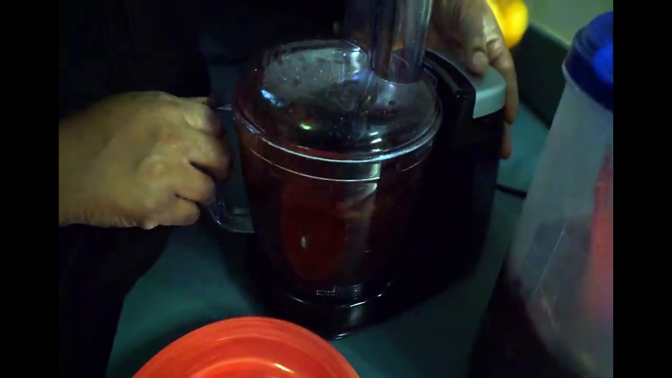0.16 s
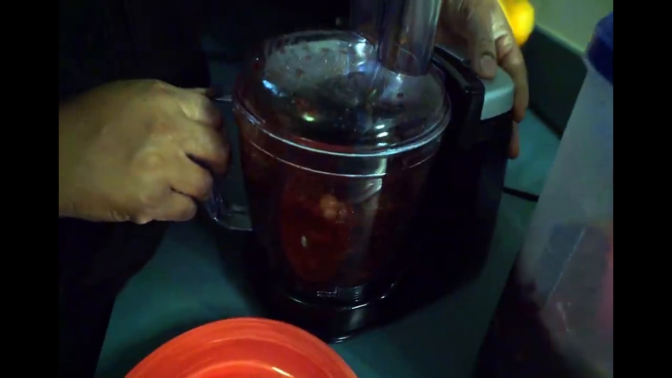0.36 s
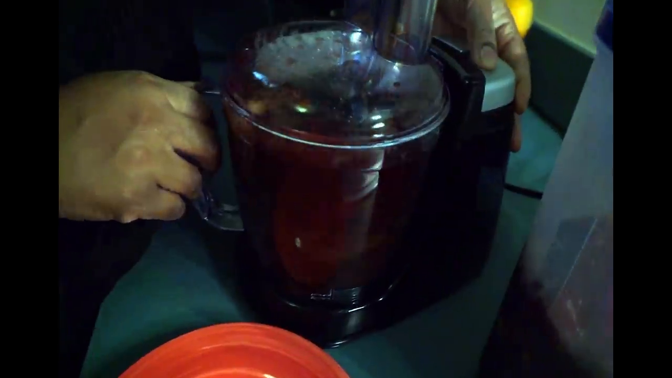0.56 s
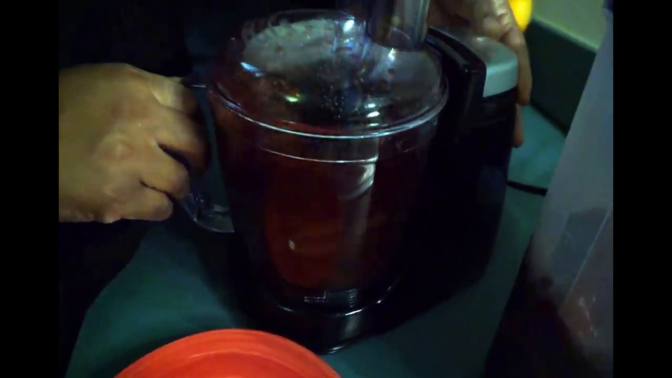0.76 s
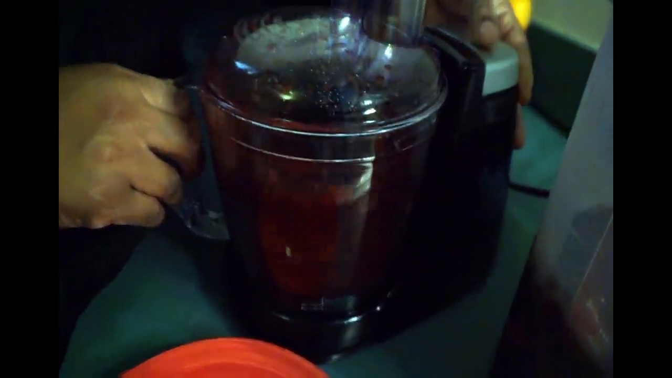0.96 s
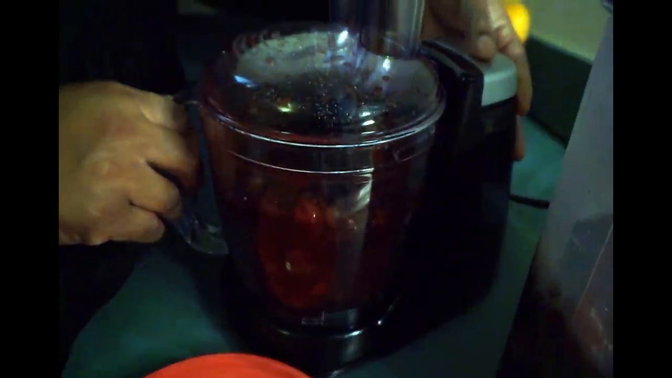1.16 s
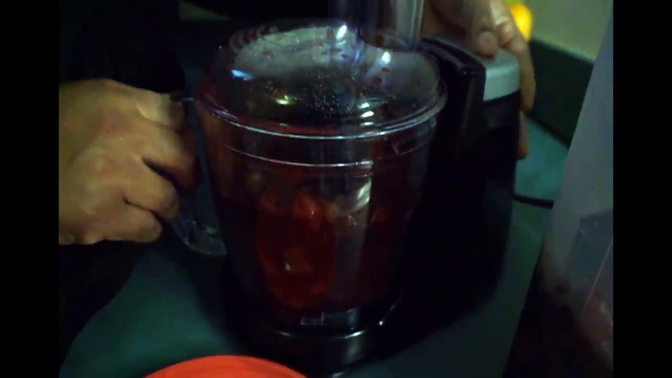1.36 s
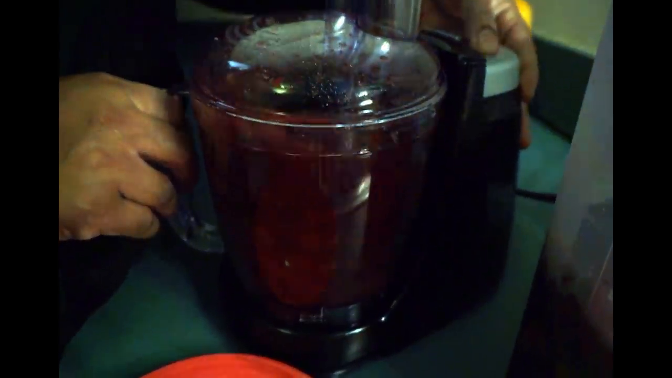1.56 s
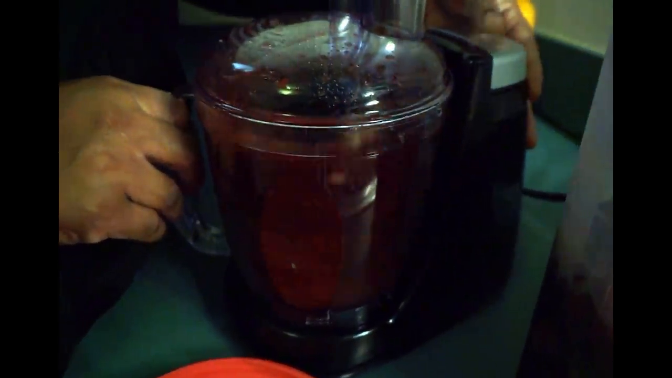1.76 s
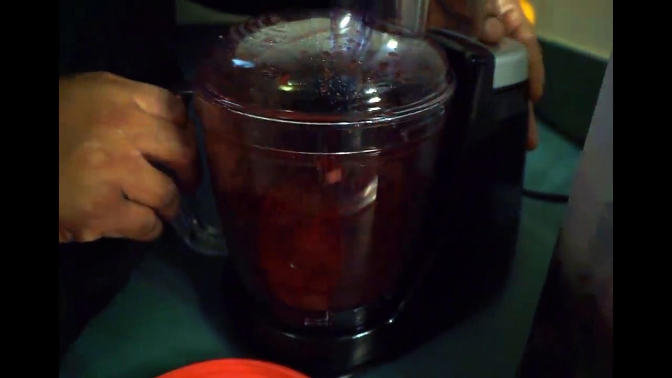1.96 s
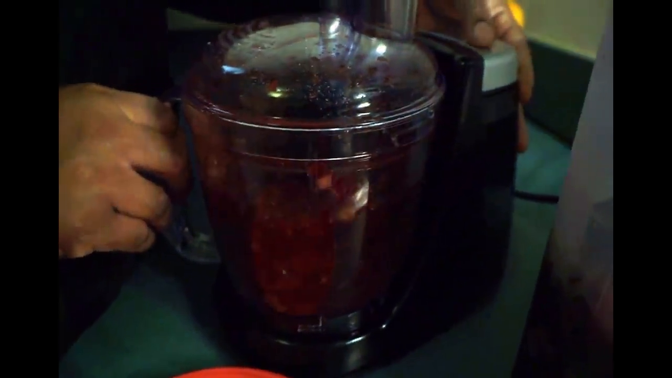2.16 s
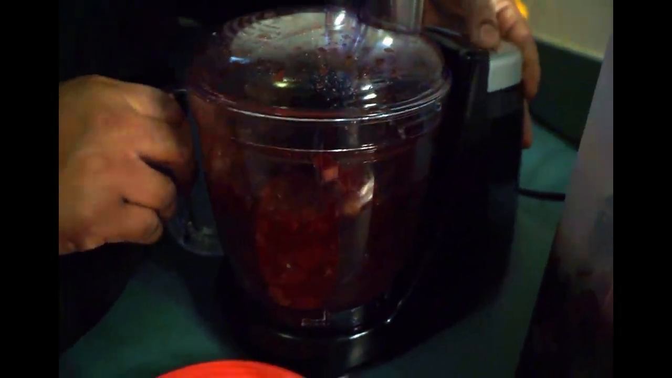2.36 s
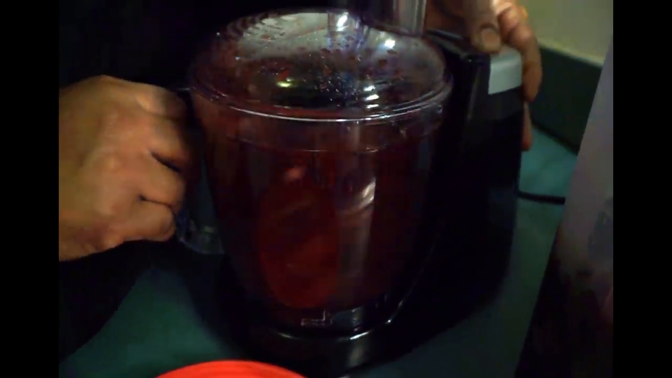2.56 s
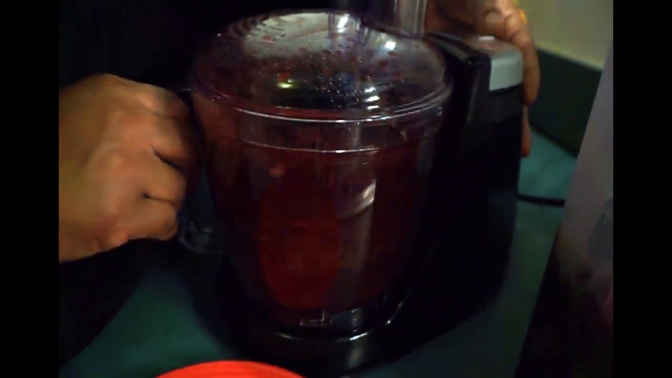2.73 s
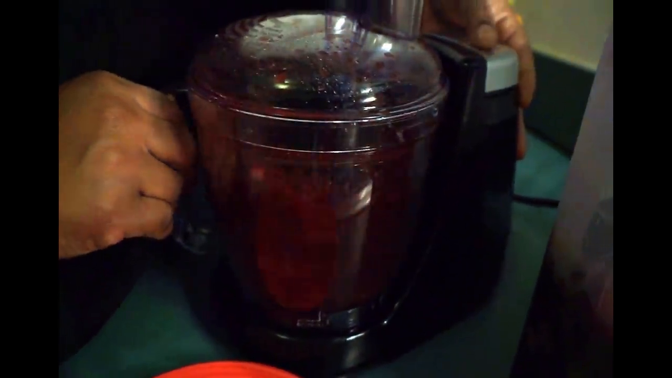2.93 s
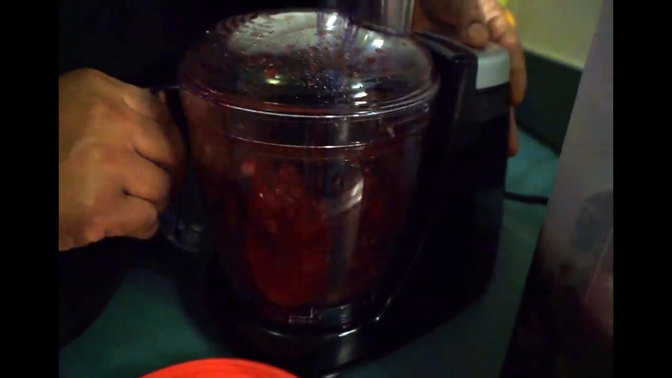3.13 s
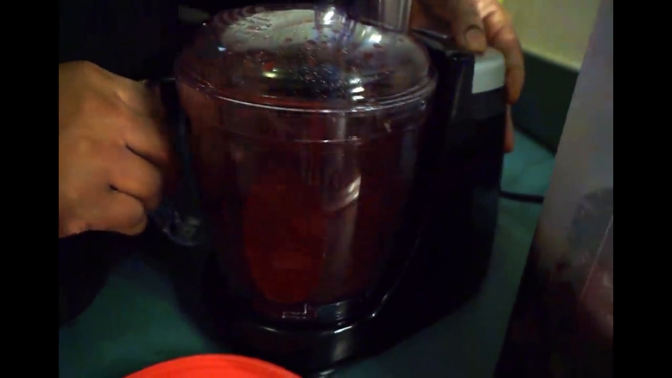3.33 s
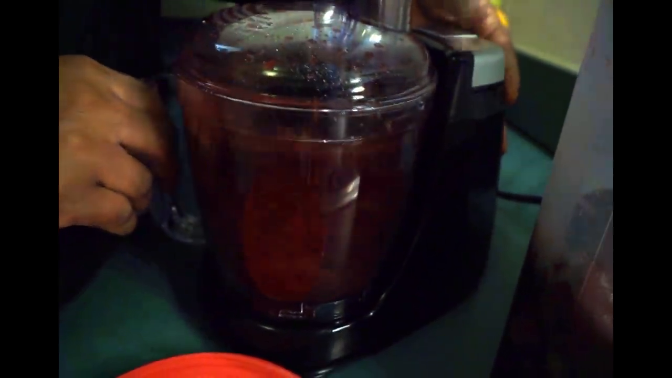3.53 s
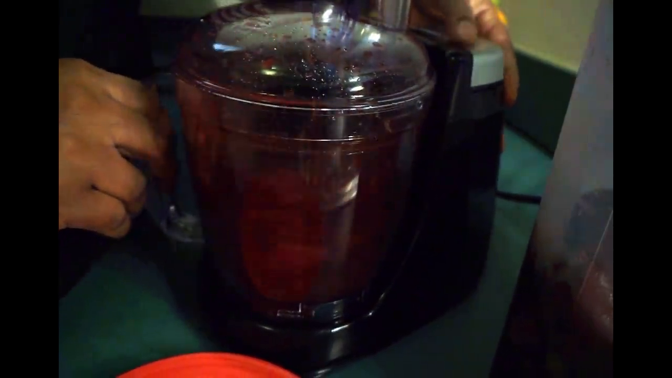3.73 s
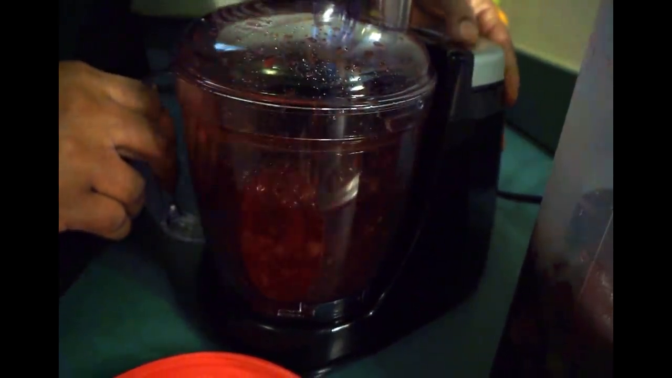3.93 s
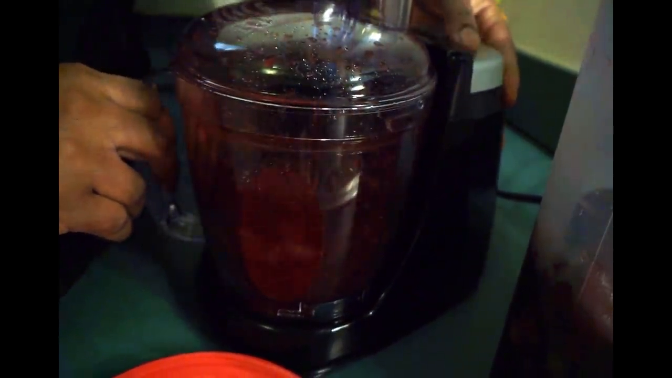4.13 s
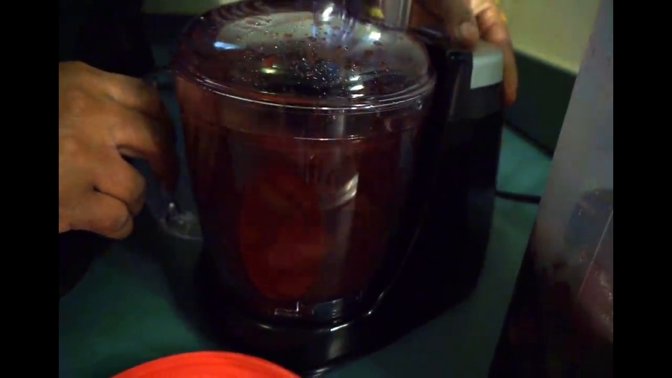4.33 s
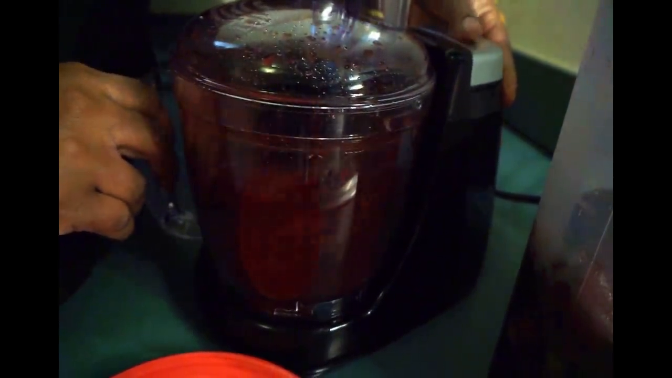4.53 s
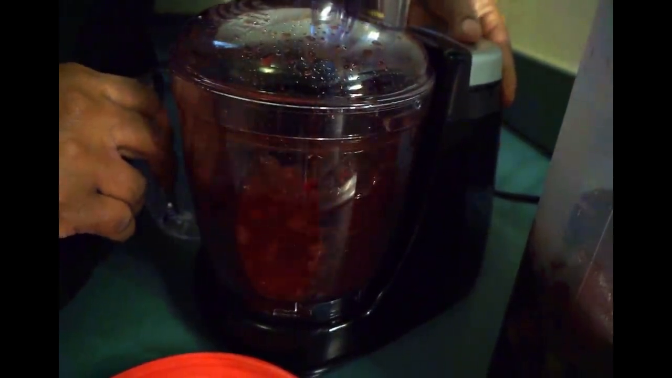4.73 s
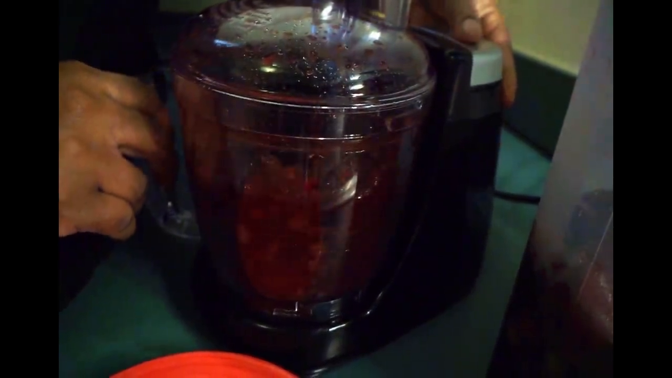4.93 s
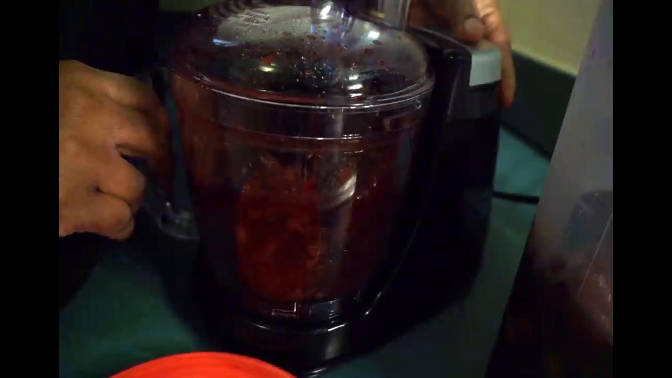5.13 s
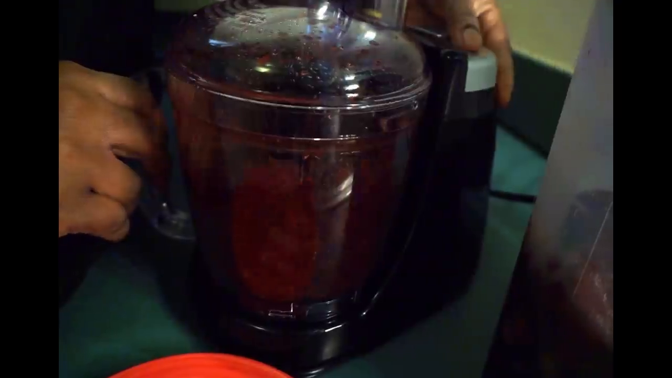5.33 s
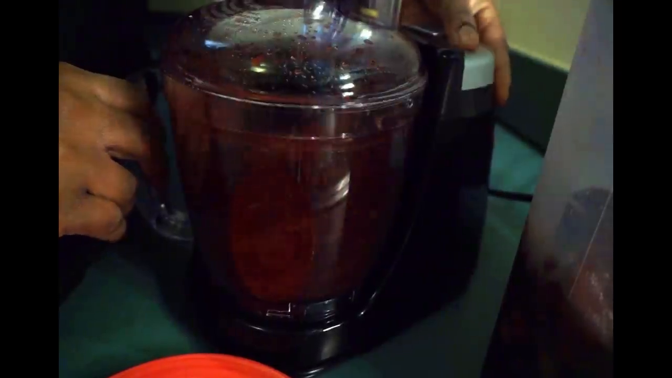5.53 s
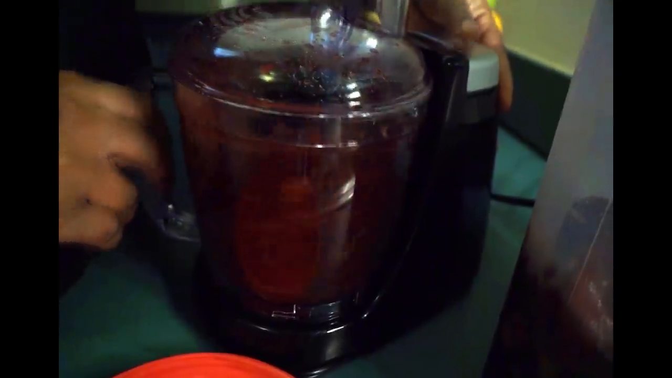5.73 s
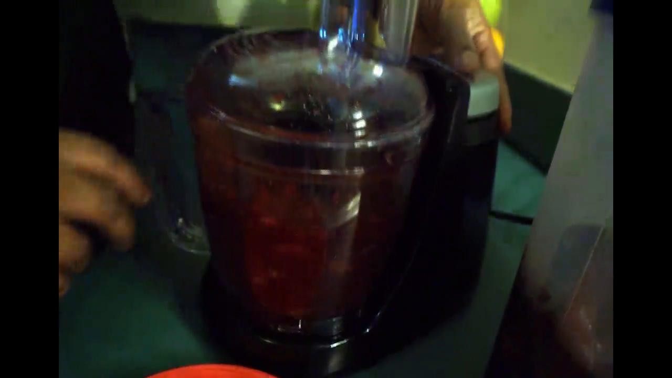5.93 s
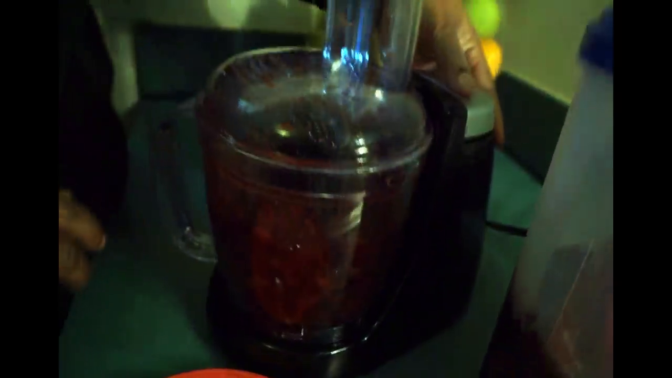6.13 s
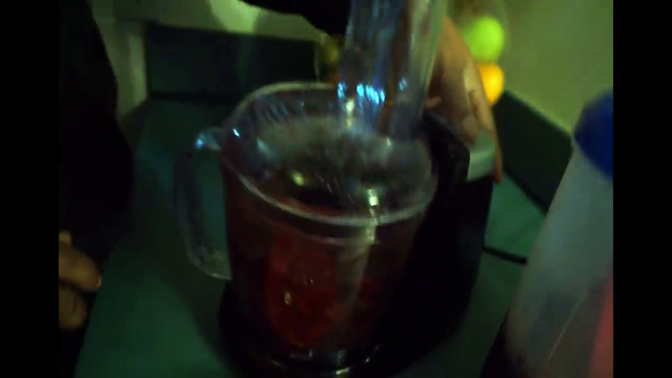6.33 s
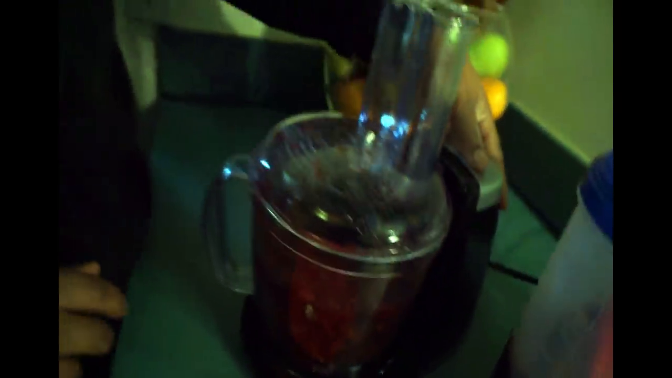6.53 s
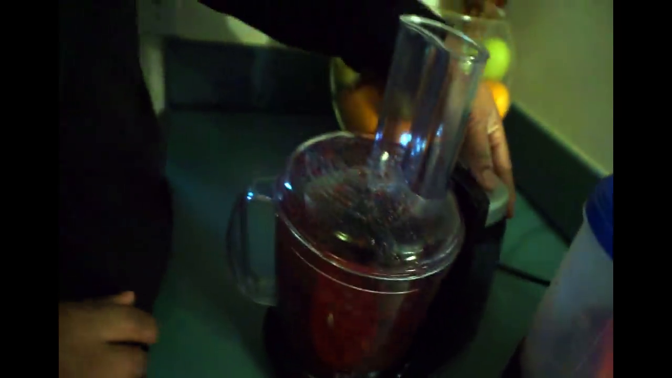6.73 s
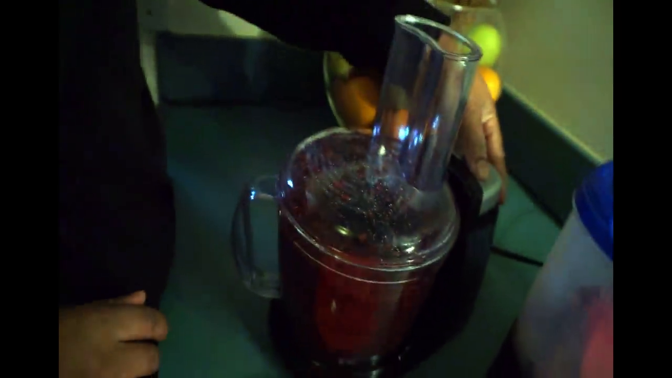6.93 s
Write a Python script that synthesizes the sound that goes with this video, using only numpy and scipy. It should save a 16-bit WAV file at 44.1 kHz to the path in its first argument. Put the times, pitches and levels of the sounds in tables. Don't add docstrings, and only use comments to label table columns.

```python
import sys
import numpy as np
from scipy import signal
from scipy.fft import rfft, irfft
from scipy.io import wavfile
from scipy.ndimage import uniform_filter1d

SR = 44100
rng = np.random.default_rng(int(sys.argv[2]) if len(sys.argv) > 2 else 0)


def materialize(psi):
    bounded = np.clip(np.atleast_2d(psi).T, -1, 1)
    quanta = np.round(bounded * 32767).astype(np.int16)
    wavfile.write(sys.argv[1], SR, quanta)


def boost_factor(decibels):
    exponent = np.asarray(decibels, float) / 20
    return 10 ** exponent


N = 308259
TIME = np.arange(N) / SR

# on_s, off_s, top_mesh_hz (tooth rate at full speed), spin_up_s, coast_s
PRESSES = [
    (-.33, -0.054, 3776, 0.051, 0.21),
    (0.511, 0.768, 3743, 0.077, 0.21),
    (1.555, 1.792, 4012, 0.086, 0.22),
    (2.513, 2.752, 3806, 0.084, 0.22),
    (3.355, 3.603, 3784, 0.071, .2),
    (4.24, 4.458, 3694, .065, .215),
    (5.414, 5.718, 4120, 0.095, 0.22),
    (6.818, 7.159, 3628, 0.067, 0.41),
]
# low_db, bright_db, whine_db, settling_db (wet bowl afterwards), jolt_db (at the start)
LOADS = [
    (1.1, 1.25, -1.8, -81.5, 30),
    (0, 0.43, -1.4, -84, 34.5),
    (0.5, 1.5, -1, -74.5, 31),
    (2, 1.5, -1.6, -71, 33),
    (0.65, 0.7, -1.9, -75.5, 37.5),
    (0.05, -0.35, -1.3, -68, 25),
    (1.36, 0.3, -0.7, -63, 32),
    (0.5, -4.5, 3.5, -80, 27),
]


def rms_one(x):
    return x / np.sqrt(np.mean(x ** 2) + 1e-20)


def at_hz(points, hz):
    points_hz, points_db = np.array(points)[:, 0], np.array(points)[:, 1]
    return np.interp(np.log(hz), np.log(points_hz), points_db)


def drift(rate_hz):
    r = np.exp(-2 * np.pi * rate_hz / SR)
    noise = rng.standard_normal(N + SR)
    return rms_one(signal.lfilter([1], [1, -2 * r, r * r], noise)[SR:])


def resonance(x, hz, width_hz):
    r = np.exp(-np.pi * width_hz / SR)
    poles = [1, -2 * r * np.cos(2 * np.pi * hz / SR), r * r]
    return signal.lfilter([(1 - r * r) / 2, 0, (r * r - 1) / 2], poles, x)


def struck(x, modes):
    body = np.zeros(N)
    for k, (hz, width_hz, db) in enumerate(modes):
        body += (-1) ** k * boost_factor(db) * rms_one(resonance(x, hz, width_hz))
    return rms_one(body)


def coloured(x, spectrum):
    hz = np.maximum(np.fft.rfftfreq(N, 1 / SR), 1)
    below = np.maximum(spectrum[0][0] / hz, 1)
    above = np.maximum(hz / spectrum[-1][0], 1)
    octaves_outside = np.log2(below * above)
    return rms_one(irfft(rfft(x) * boost_factor(at_hz(spectrum, hz) - 17 * octaves_outside), N))


def knocks(per_s, spread_db, smooth):
    sizes = boost_factor(spread_db * np.minimum(rng.exponential(1, N), 5)) * rng.choice([-1, 1], N)
    return rms_one(sizes * (rng.random(N) < per_s / SR)) + smooth * rng.standard_normal(N)


def evened(x, share):
    power = uniform_filter1d(x ** 2, size=700)
    return rms_one(x / (power + .05) ** (share / 2))


def swells(table, width_s):
    s, *gains = np.transpose(table)
    bells = np.exp(-.5 * ((TIME[::32] - s[:, None]) / width_s) ** 2)
    return np.repeat(np.array(gains) @ bells, repeats=32, axis=1)[:, :N]


def room_tone():
    # pitch_hz, level_db (per Hz)
    rumble_spectrum = [(40, -32.5), (90, -24.5), (160, -19), (215, -4.5), (310, -3.5), (400, -4.5),
                       (440, -9), (620, -9.5), (850, -14), (1300, -19), (2400, -31.5), (3800, -34),
                       (5000, -41), (15000, -50.5)]
    # pitch_hz, level_db (rms)
    fridge = [(59, -73), (118, -60), (237, -62), (358, -60.5)]
    rumble = boost_factor(-49.5 + 1.2 * drift(8)) * coloured(rng.standard_normal(N), rumble_spectrum)
    hum = np.zeros(N)
    for hz, db in fridge:
        hum += boost_factor(db + 2 + 3.0 * drift(9)) * np.sin(2 * np.pi * hz * TIME + .6 * drift(6))
    return rumble + hum


def kitchen(x):
    t60_s, level_db = .3, -17
    age = np.arange(SR // 2) / SR
    tail = rng.standard_normal(len(age)) * boost_factor(-60 * age / t60_s) * (age > .006)
    tail = signal.lfilter([1], [1, -.6], tail)
    return boost_factor(level_db) * signal.fftconvolve(x, tail / np.sqrt(np.sum(tail ** 2)))[:N]


def glugs():
    # start_s, level_db (peak), pitch_hz, t60_s
    pockets = [
        (2.338, -30, 293, 0.026),
        (4.923, -29.5, 428, 0.09),
        (4.954, -28.5, 434, 0.04),
        (4.991, -29, 705, 0.053),
        (4.992, -29, 482, .05),
        (5.012, -32, 770, 0.069),
        (5.03, -38, 808, 0.067),
        (5.06, -44, 800, .06),
    ]
    out = np.zeros(N)
    for s, db, hz, t60 in pockets:
        age = np.clip(TIME - s, 0, 1)
        envelope = boost_factor(db - 60 * age / t60) * np.tanh(age / .0015)
        out += envelope * np.sin(2 * np.pi * hz * age * (1 + 2.0 * age))
    return out


def creaks():
    # start_s, level_db (peak), brightness_db (above 2.5 kHz), t60_s
    creak_events = [(0.471, -32.5, -11.5, 0.1), (0.48, -36.5, -7, 0.14), (1.528, -32.5, -9.5, 0.1),
                    (1.532, -27.5, -7.5, 0.049), (2.461, -27.5, -14, 0.14), (2.477, -37.5, -10.5, 0.21),
                    (3.14, -32, -10, 0.0867), (3.302, -25.5, -15.5, 0.17), (3.321, -39, -8, 0.16),
                    (4.112, -33, -24, 0.075), (4.172, -34, -20, 0.1), (5.379, -27, -9, 0.055),
                    (5.389, -27, -13, 0.083), (6.416, -49.5, -10, 0.1), (6.587, -32.5, -16, 0.109),
                    (6.694, -41, -16, 0.079), (6.755, -39, -30.5, 0.136)]
    # start_s, level_db (peak), t60_s
    ticks = [
        (3.142, -41, .015),
        (3.154, -37, .015),
        (4.279, -5, .03),
    ]
    # pitch_hz, level_db
    snap_modes = [(2850, 0), (3250, -3), (4050, -4), (5600, -17.5), (7900, -22), (11500, -22.5)]
    rub = knocks(per_s=1500, spread_db=3.0, smooth=.6)
    dull = coloured(rub, [(300, -6), (500, 3.5), (1000, -3), (1800, -13.5), (2500, -33.0)])
    bright = coloured(rub, [(2200, -6.5), (3200, 3.0), (6000, -11.5), (12000, -15.5)])
    out = np.zeros(N)
    for s, db, bright_db, t60 in creak_events:
        age = np.clip(TIME - s, 0, 1)
        envelope = boost_factor(db - 10.5 - 60 * age / t60) * np.tanh(age / 0.00087)
        out += envelope * (dull + boost_factor(bright_db) * bright)
    for s, db, t60 in ticks:
        age = np.clip(TIME - s, 0, 1)
        ring = sum(boost_factor(mode_db - 2) * np.sin(2 * np.pi * hz * age) for hz, mode_db in snap_modes)
        out += boost_factor(db - 6 - 60 * age / t60) * (age > 0) * (.5 * bright + ring)
    return out


def motor():
    friction_hz = 600
    mesh_hz, powered = np.zeros(N), np.zeros(N)
    for on, off, top_hz, spin_up, coast in PRESSES:
        driven = top_hz * (1 - np.exp(-np.clip(np.minimum(TIME, off) - on, 0, 9) / spin_up))
        speed = (driven + friction_hz) * np.exp(-np.clip(TIME - off, 0, 9) / coast) - friction_hz
        mesh_hz = np.maximum(mesh_hz, speed)
        powered += (TIME > on) & (TIME < off)
    return mesh_hz, uniform_filter1d(powered, size=800)


def pulse_levels(mesh_hz):
    # full_speed_db, law_db (per dB of speed), kick_db (start), loss_db (unpowered), surge_db
    layers = [
        (-13, 0.7467, 9.5, 10, 2.5),
        (-20, 0.44, 10.5, 12, 1.5),
        (-22.5, 0.98, 9, 4, 0),
        (-28.5, 0.97, 10.5, 0, 1),
        (8.5, -0.35, -2, -4.5, -0.5),
    ]
    # centre_s, boom_db, base_db, bright_db
    catches = [(.008, 9, 1, 1.5), (.155, 1.5, -7, -0.5), (6.955, 5, -1.5, 1.5), (.555, 5.5, 5, -1),
               (.655, 2.5, 1.5, .5), (0.811, 6.5, 7, -1.5), (.891, 8.5, 1, -1), (6.925, 5, -0.5, 0),
               (1.649, 3, -0.5, -4.5), (1.697, -0.5, 3, -1), (1.781, 1, 1, 1), (1.846, 5, 9, 3.5),
               (1.934, 6, 3, 2), (2.084, 5.5, -5, -2.5), (2.641, -1.5, -9.5, 1), (2.71, -0.5, 3, 2.5),
               (2.777, 4, 2.5, 3), (2.535, 0, 7.5, .5), (3.031, -11.5, -1, 2), (3.635, 1, 8, -1),
               (3.824, 9.5, 3.5, -2.5), (3.864, 7.5, 0.5, .5), (4.345, -4.5, -1, -1.5),
               (4.391, -5.5, 1.5, 2.5), (4.453, 2.5, -3, -0.5), (4.694, 3, -12, 3.5), (4.739, 4, 2, 1.5),
               (5.589, 4.5, -6, 2.5), (5.716, 7.5, 1.5, 1), (6.029, 5, -3, -5)]
    # centre_s, level_db
    sings = [(.015, 0), (.15, 5), (.65, 3.5), (.78, -0.5), (.98, 1), (1.69, 2.5), (1.83, 0), (1.92, -2.5),
             (2.05, -7), (2.64, 4.5), (2.71, -2), (2.79, 0), (2.94, 3.5), (3.49, 5), (3.56, -5), (3.68, -5),
             (3.76, -2.5), (3.82, 1), (4.4, -0.5), (4.5, 0), (4.61, 2), (5.47, 1.5), (5.56, 6),
             (5.64, -4.5), (5.74, 3.5), (5.83, -1.5), (5.92, -0.5), (6.88, 3.5), (6.95, 1.5)]
    full_mesh_hz, surge_mesh_hz, surge_width_hz = 3950, 3100, 300
    stall_mesh_hz, stop_loss_db = 372, 12.5
    fade_mesh_hz, fade_db = 800, 7
    kick_s, unload_s, contact_s = 0.048, 0.21, 0.0023
    release_s, release_db = 0.079, [1.8, 2.5, 2, 1.7, 1.5]

    on, off = np.transpose(PRESSES)[:2]
    press = np.searchsorted(on, TIME) - 1
    age = TIME - on[press]
    coasted = np.clip(TIME - off[press], 0, 9)
    coasting = coasted > 0
    low, bright, sung, settle, _ = np.array(LOADS)[press].T

    speed_db = 20 * np.log10(np.maximum(mesh_hz, 50) / full_mesh_hz)
    surge = .5 + .5 * np.tanh((mesh_hz - surge_mesh_hz) / surge_width_hz)
    full, law, kick, loss, lift = np.transpose(layers)[:, :, None]
    levels = full + law * speed_db + lift * surge
    levels = levels + kick * np.exp(-age / kick_s)
    levels = levels - loss * (1 - np.exp(-coasted / unload_s))
    released = .5 + .5 * np.tanh((coasted - release_s) / 0.013)
    levels = levels - np.array(release_db)[:, None] * released

    stall_db = stop_loss_db * coasting * np.clip(1 - mesh_hz / stall_mesh_hz, 0, 1) + 200 * (mesh_hz <= 0)
    boom, base, sharp = swells(catches, width_s=0.009)
    sharp = sharp - fade_db * coasting * np.clip(1 - mesh_hz / fade_mesh_hz, 0, 1)
    boom_change = low + boom - stall_db + 2 * drift(18)
    base_change = low + base - stall_db + 2 * drift(18)
    bright_change = bright + sharp - stall_db
    whine_change = sung + swells(sings, width_s=0.016)[0]
    levels = levels + [boom_change, base_change, bright_change, bright_change, whine_change]

    settling_db = settle - 53 * (coasted - .4) - 200 * (coasted <= 0)
    bite = np.ones(N)
    for start in on:
        bite *= np.where(TIME < start, 1, np.tanh((TIME - start) / contact_s))
    return levels, settling_db, bite


def jolts():
    delay_s = .003
    clicks = np.zeros(N)
    for press, load in zip(PRESSES[1:], LOADS[1:]):
        clicks[int((press[0] + delay_s) * SR)] = boost_factor(load[4])
    return clicks


def whine(mesh_hz):
    pinion_teeth = 12
    wear = .6 + mesh_hz / 4500
    turning = np.cumsum(2 * np.pi * mesh_hz * (1 + .018 * wear * drift(30)) / SR)
    phase = turning + .85 * np.sin(turning / pinion_teeth) + .8 * wear * drift(250)
    tone = np.sin(phase) + boost_factor(-11.5) * np.sin(2 * phase) + boost_factor(-18.5) * np.sin(3 * phase)
    strength = boost_factor(3.2 * wear * drift(60) + 1.2 * drift(15))
    return tone * strength * np.clip(mesh_hz / 250, 0, 1)


def processor():
    # pitch_hz, width_hz, level_db
    housing = [(428, 44, -11), (503, 38, -3), (562.8, 50, -6), (642.5, 28, -0.2), (752, 42, -1.5),
               (802.5, 42, -2.5), (920, 140, -10), (1156, 61, -7.5)]
    # pitch_hz, width_hz, level_db
    base_modes = [(112.4, 30, -20.5), (137.4, 40, -14), (197.3, 43, -8.5), (229.8, 42, -8),
                  (302.6, 14.3, -2.5), (380.3, 38, -6)]
    # pitch_hz, level_db (per Hz)
    clatter_spectrum = [(900, -2), (1200, 3), (1900, -1), (2600, -4.5), (3100, -7.5), (3700, -2.5),
                        (4400, -17.5)]
    hiss_spectrum = [(2470, -36.5), (4200, -3.5), (4460, -8.5), (5920, -11), (8090, -14.5), (13900, -23.5),
                     (14900, -20), (15500, -21)]
    # pitch_hz, width_hz, level_db
    wall_rings = [(2810, 90, 1), (3130, 60, 6), (3414, 90, -1.5), (5024, 120, -1.5), (5785, 180, -1.5),
                  (7000, 99, -6.5), (9700, 150, -1)]
    # pitch_hz, width_hz, level_db
    mesh_colour = [(515, 39, 10), (637, 50, 6), (800, 39, 4), (986, 63, 6.5), (1153, 73, 8),
                   (1477, 270, 4.5), (1682, 50, 1.5), (1976, 100, 0.5), (2195, 150, 2), (2550, 230, 3.5),
                   (3031, 140, 8.5), (3259, 150, 7.5), (3410, 200, 1.5), (3890, 220, 4.5), (5200, 410, 3),
                   (6180, 430, 3.5)]
    # pitch_hz, width_hz, level_db
    wet_bowl = [(2930, 200, -2), (3280, 150, -1.5), (4660, 250, 0.5), (7100, 300, -8), (6500, 4000, -2.5)]

    mesh_hz, powered = motor()
    (boom_db, base_db, clatter_db, hiss_db, whine_db), settling_db, bite = pulse_levels(mesh_hz)
    throb = 1 + 0.088 * powered * np.cos(2 * np.pi * 120 * TIME)
    load = boost_factor(0.33 * drift(25))
    teeth = knocks(per_s=800, spread_db=3.5, smooth=1.0) * throb
    merged = (1 - powered) * np.clip((1000 - mesh_hz) / 150, 0, 1) * np.clip((mesh_hz - 380) / 80, 0, 1)

    blows = teeth + jolts()
    boom = boost_factor(boom_db - 3 * merged) * evened(struck(blows, housing), share=.25)
    boom = boom + boost_factor(base_db) * evened(struck(blows, base_modes), share=.15)

    rattle = teeth + .6 * knocks(per_s=270, spread_db=3.0, smooth=1.1)
    clatter = boost_factor(clatter_db + 3.5) * coloured(rattle, clatter_spectrum)
    brushes = knocks(per_s=3900, spread_db=-1.0, smooth=0.22) * throb
    hiss = boost_factor(hiss_db - 2.0) * coloured(brushes, hiss_spectrum)
    air = hiss - signal.lfilter(*signal.butter(1, 6000, fs=SR), hiss)
    air_gain = (np.maximum(mesh_hz, 50) / 3950) ** (0.67 * powered)
    bright = clatter + hiss + air * (air_gain - 1)
    bright = bright + sum(boost_factor(db) * resonance(bright, hz, width) for hz, width, db in wall_rings)

    mesh = (boost_factor(hiss_db + whine_db) + merged * boost_factor(boom_db - 3)) * whine(mesh_hz)
    sung = np.zeros(N)
    for k, (hz, width, db) in enumerate(mesh_colour):
        sung += (-1) ** k * boost_factor(db) * resonance(mesh, hz, width)

    drops = knocks(per_s=900, spread_db=1.5, smooth=.9)
    settling = boost_factor(settling_db + 3 * drift(5)) * struck(drops, wet_bowl)
    return bite * (boom + load * bright + sung + boost_factor(-12.5) * mesh) + settling


def scene():
    near = processor() + creaks() + glugs()
    return (near + kitchen(near) + room_tone())[None]


def roll_off(x):
    return signal.sosfilt(signal.butter(12, 15640, fs=SR, output="sos"), x)


def record(dry):
    overload, knee, top_hz = .73, 6, 15600
    heard = signal.sosfilt(signal.butter(2, 60, "high", fs=SR, output="sos"), dry)
    squeezed = heard / (1 + np.abs(heard / overload) ** knee) ** (1 / knee)
    mix = signal.sosfilt(signal.cheby2(10, 30, top_hz, fs=SR, output="sos"), squeezed)
    return roll_off(mix)


dry = scene()
out = record(dry)
materialize(out)
```